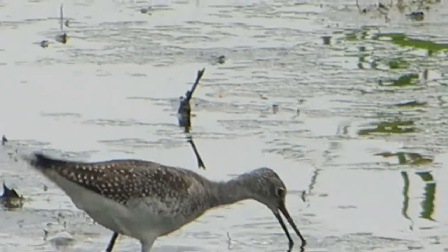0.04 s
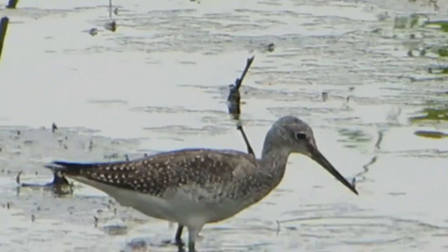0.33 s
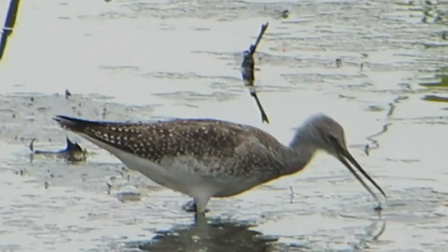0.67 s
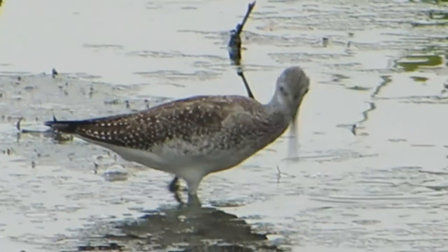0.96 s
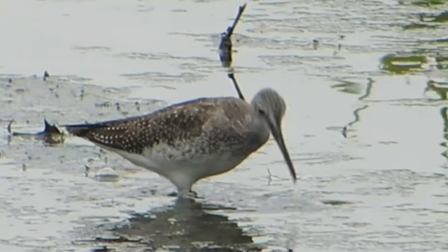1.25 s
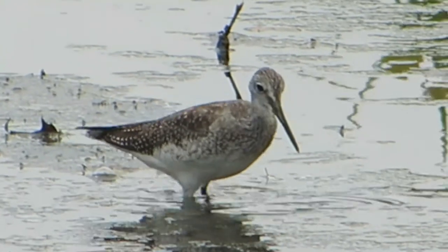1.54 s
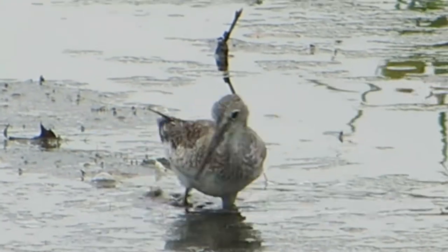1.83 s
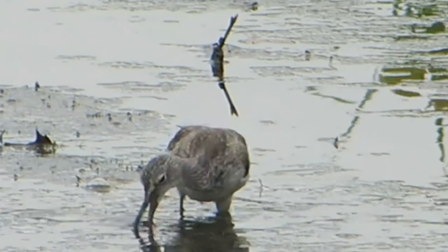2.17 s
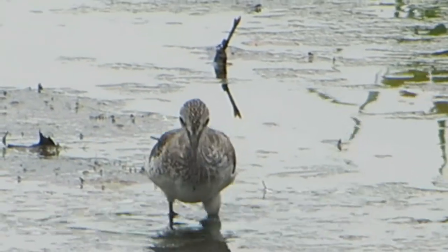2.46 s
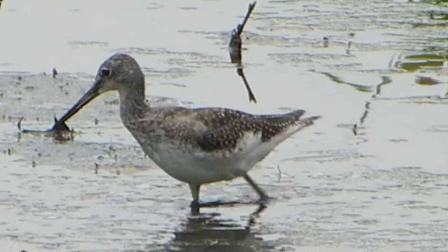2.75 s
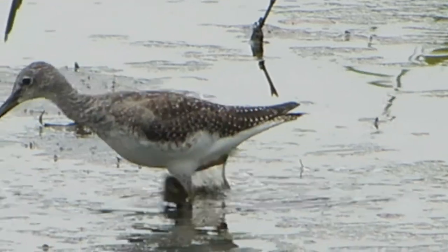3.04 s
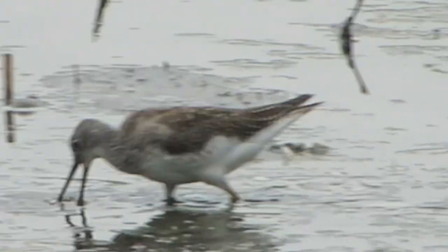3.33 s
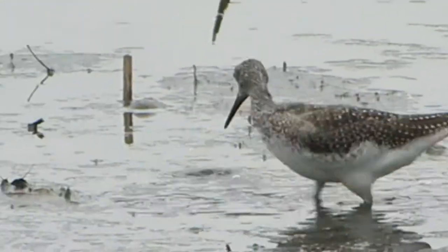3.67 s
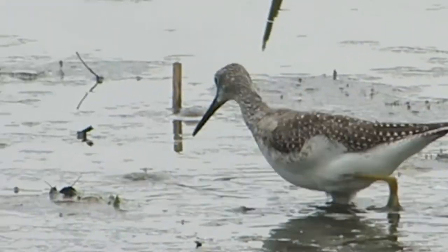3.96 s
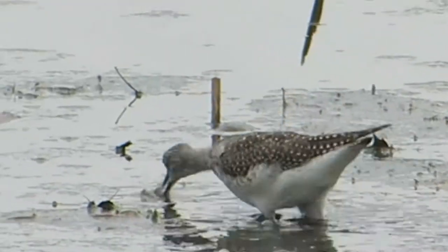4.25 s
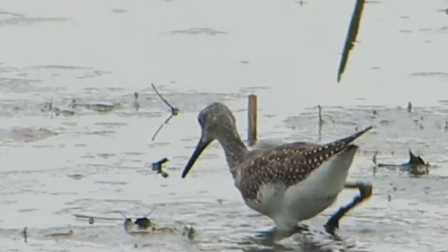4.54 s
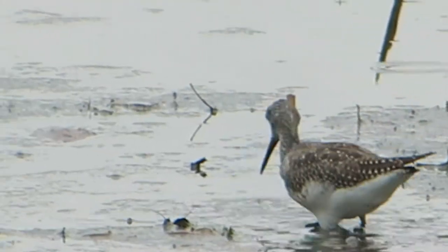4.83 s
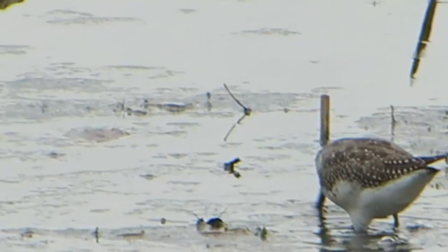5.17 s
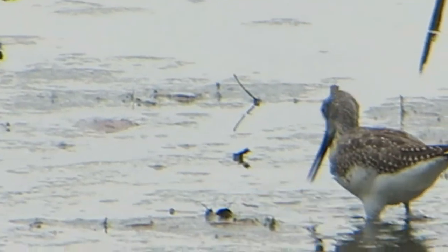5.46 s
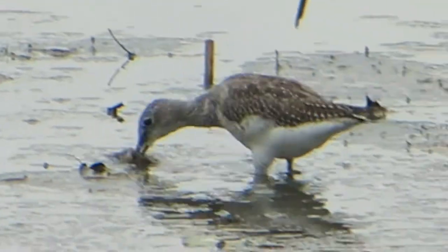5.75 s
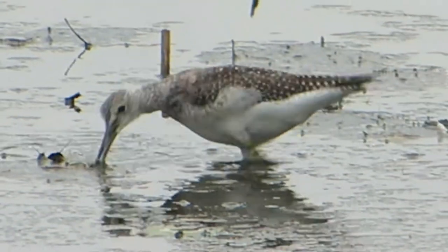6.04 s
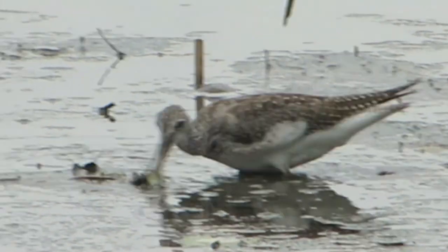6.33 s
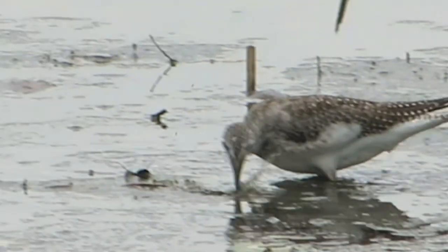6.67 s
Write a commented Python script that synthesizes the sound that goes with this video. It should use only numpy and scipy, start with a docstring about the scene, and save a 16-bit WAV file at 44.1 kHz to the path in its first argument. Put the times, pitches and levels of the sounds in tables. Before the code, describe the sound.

A steady low rumble of far road traffic and lorries, with thin insect buzzing and a few soft wind buffets.

```python
"""A marsh beside a distant road: tyres wash, engines rumble, and three lorries drone and fade.
Cicadas buzz their tymbals in the trees, three near enough to give thin tones over the chorus.
A far bird peeps, puffs of wind stir the reeds and buffet the microphone, and a few small ticks
sound close by. A faint electronic hiss lies under it all; the sound stops dead with a soft thump."""
import sys
import numpy as np
from scipy import signal
from scipy.fft import rfft, irfft
from scipy.io import wavfile

SR = 44100
rng = np.random.default_rng(int(sys.argv[2]) if len(sys.argv) > 2 else 0)


def materialize(psi):
    """Save the field psi as 16-bit PCM at rate SR to the path in sys.argv[1].

    A 1-D psi becomes a single channel; in a 2-D psi each row is a channel.
    """
    bounded = np.clip(np.atleast_2d(psi).T, -1, 1)
    quanta = np.round(bounded * 32767).astype(np.int16)
    wavfile.write(sys.argv[1], SR, quanta)


N = 295470
TIME = np.arange(N) / SR
BIN_HZ = np.arange(N // 2 + 1) * SR / N


def undb(db):
    """Decibels to gain."""
    return 10 ** (np.asarray(db) / 20)


def unit(x):
    """Scale to rms 1."""
    return x / np.sqrt(np.mean(x ** 2))


def curve(points):
    """Automation: straight lines through (t/s, value) points."""
    return np.interp(TIME, *np.transpose(points))


def ramp(start_s, length_s):
    """A linear rise from 0 to 1."""
    return np.clip((TIME - start_s) / length_s, 0, 1)


def swell(peak_s, half_s):
    """A pass-by envelope: 1 at its peak, 6 dB down half_s before and after."""
    return 1 / (1 + ((TIME - peak_s) / half_s) ** 2)


def walk(rate_hz):
    """A random wander of rms 1, with rate_hz new values a second."""
    levels = rng.standard_normal(int(N / SR * rate_hz) + 3)
    return unit(np.interp(TIME * rate_hz + rng.random(), np.arange(len(levels)), levels))


def lowpass(x, hz, order=2):
    """Butterworth low-pass."""
    return signal.sosfilt(signal.butter(order, hz, fs=SR, output="sos"), x)


def pan(x, left_db):
    """Lean a sound left by so many dB."""
    return x * undb(np.vstack([left_db, -left_db]) / 2)


def noise(colour):
    """Noise of rms 1, shaped by (f/Hz, level/dB) points and rolled off past both ends."""
    hz, db = np.transpose(colour)
    f = np.maximum(BIN_HZ, 1)
    rolloff = np.minimum(f / hz[0], 1) ** 2 * np.minimum(hz[-1] / f, 1) ** 2
    shape = undb(np.interp(np.log(f), np.log(hz), db))
    return unit(irfft(rfft(rng.standard_normal(N)) * rolloff * shape, N))


def bed(colour, side_db):
    """A wide noise bed: independent mid and side."""
    return noise(colour) + undb(side_db) * noise(colour) * np.array([[1], [-1]])


def gliding_band(peak_s, half_s, centre_hz, glide_hz_per_s, width_hz, level_db, left_db):
    """A band of noise that slides in pitch as it comes and goes."""
    hz = centre_hz + glide_hz_per_s * (TIME - peak_s)
    flutter = lowpass(rng.standard_normal(N) + 1j * rng.standard_normal(N), width_hz / 2, order=3)
    band = unit(np.real(flutter * np.exp(2j * np.pi * np.cumsum(hz) / SR)))
    return pan(band * swell(peak_s, half_s) * undb(level_db), left_db)


# Colour of the hiss: f/Hz, relative level/dB
HISS_SPECTRUM = [(1000, 3), (5000, 2.5), (10000, 0), (11800, -3), (13000, 3.5), (14000, -13), (15500, -32)]
def electronics(hiss_db=-66.5, whine_hz=15734, whine_db=-84):
    """The noise floor: electronic hiss and a faint high whine."""
    whine = np.sqrt(2) * np.sin(2 * np.pi * whine_hz * TIME)
    return undb(hiss_db) * bed(HISS_SPECTRUM, side_db=4.5) + undb(whine_db) * whine


# Colour of the reeds: f/Hz, relative level/dB
REED_SPECTRUM = [(2400, -6.5), (3300, 4), (4100, 2), (5400, -3), (7500, -15.5)]
# Gusts in the reeds: peak t/s, 6 dB fall/s, level/dB
REED_GUSTS = [(.1, 0.56, -58.5), (5.8, 1.2, -63)]
def reeds():
    """A soft rustle that rises and falls with the gusts."""
    strength = sum(undb(db) * swell(s, half_s) for s, half_s, db in REED_GUSTS)
    return bed(REED_SPECTRUM, side_db=-8.0) * strength


# Bird calls: t/s, f/Hz, level/dB
BIRD_PEEPS = [(1.32, 3290, -59), (1.76, 3860, -60.5), (2.26, 3850, -57.5)]
def bird(attack_s=0.02, t60_s=0.55, sag_hz_per_s=700, waver=0.02):
    """A far bird's faint, unsteady peeps sag as they die."""
    out = 0
    for s, start_hz, db in BIRD_PEEPS:
        age = np.maximum(TIME - s, 0)
        hz = (start_hz - sag_hz_per_s * np.minimum(age, t60_s)) * (1 + waver * walk(150))
        gain = undb(db) * ramp(s, attack_s) * np.exp(-np.log(1000) * age / t60_s)
        out = out + gain * np.sin(2 * np.pi * np.cumsum(hz) / SR)
    return out


# Close ticks: t/s, peak level/dB, ring f/Hz, knock against ring/dB
CLOSE_TICKS = [(5.3233, -33, 4700, -9), (5.3275, -32.5, 4600, -9), (5.526, -31.5, 3900, -5),
               (5.6558, -22.5, 5300, -2.5), (5.6572, -33, 9400, -9), (5.6576, -30.5, 5200, -6),
               (5.6584, -32.5, 9800, -7), (5.6591, -35, 7000, -7)]
def ticks(t60_s=0.0016, grit_db=-9, grit_t60_s=0.01, knock_hz=1900, edge_hz=11500):
    """Tiny snaps: each rings for a few cycles over a duller knock and sheds a little bright grit."""
    t = TIME[:SR // 50]
    out = np.zeros(N)
    for s, db, hz, knock_db in CLOSE_TICKS:
        tones = np.sin(2 * np.pi * hz * t) + undb(knock_db) * np.sin(2 * np.pi * knock_hz * t)
        ring = tones * np.exp(-np.log(1000) * t / t60_s)
        burst = rng.standard_normal(len(t)) * np.exp(-np.log(1000) * t / grit_t60_s)
        grit_band = signal.butter(2, [hz / 1.6, min(hz * 1.5, SR / 3)], "band", fs=SR, output="sos")
        snap = lowpass(ring + undb(grit_db) * signal.sosfilt(grit_band, burst), edge_hz, order=6)
        start = int(s * SR)
        out[start:start + len(t)] += undb(db) * snap / np.abs(snap).max()
    return pan(out, left_db=4)


# Wind buffets, then in the last row a soft low thump as the sound cuts off:
# t/s, level/dB, half-length/s, cutoff f/Hz
LOW_THUMPS = [(0.046, -21.5, 0.0084, 263), (0.262, -34, 0.022, 230), (2.003, -44, 0.035, 170),
              (2.85, -50, 0.13, 79.2), (4.745, -42, 0.064, 120.8), (5.444, -29, 0.041, 197),
              (5.454, -30, 0.018, 374), (5.536, -35.5, 0.074, 150.3), (5.667, -35.5, 0.025, 150),
              (5.878, -37, 0.038, 171), (6.055, -42, 0.051, 120), (6.22, -37, 0.027, 109.7)]
def wind_and_end_thump(breeze_db=-66.5, breeze_hz=70, gust_db=-59.5, flutter_db=4, mid_db=-12):
    """Eddies push the microphone's two ports mostly in opposite directions; a thump marks the cut."""
    low_colour = [(15, -19.0), (35, 3.5), (120, 0.5), (500, -1.5)]  # f/Hz, relative level/dB
    strength = undb(breeze_db) + undb(gust_db) * swell(peak_s=5.8, half_s=0.25)
    side = unit(lowpass(noise(low_colour), breeze_hz)) * strength * undb(flutter_db * walk(6))
    mid = 0
    rumble = np.array([noise(low_colour), noise(low_colour)])
    for s, db, half_length_s, cutoff_hz in LOW_THUMPS:
        envelope = np.exp(-2 * ((TIME - s) / half_length_s) ** 2)
        thump = lowpass(rumble, cutoff_hz, order=4) * envelope
        rms = np.sqrt(np.sum(thump ** 2, axis=1, keepdims=True) / np.sum(envelope ** 2))
        side_thump, mid_thump = undb(db) * thump / rms
        side, mid = side + side_thump, mid + undb(mid_db) * mid_thump
    return np.array([mid + side, mid - side])


# Two insect buzzes, then the fading cicada's sag:
# peak t/s, 6 dB fall/s, f/Hz, glide/(Hz/s), width/Hz, level/dB, left/dB
SHORT_BUZZES = [(.4, 0.7, 7350, 0.5, 160, -64, 4.5), (1.23, 0.44, 6850, 2, 300, -63, 1.5),
                (3.75, 0.1, 5440, -400, 299, -64.5, 0)]
def short_buzzes():
    """Two high insect buzzes come and go; later the fading cicada's buzz slides down as it slows."""
    return sum(gliding_band(*row) for row in SHORT_BUZZES)


# Colour of the cicada chorus: f/Hz, relative level/dB
CHORUS_SPECTRUM = [(3000, -13), (4600, -13), (5500, -4.5), (6100, -5), (7200, -2), (8000, -6), (8800, -8),
                   (9800, -16), (12000, -22)]
def cicada_chorus(sizzle_db=-58, swell_db=1.17, buzz_ratio_db=-0.5, count=9):
    """Many far cicadas: most blur into a sizzle, a few keep their pulse. The bed lifts a little midway."""
    body = undb(np.interp(BIN_HZ, *np.transpose(CHORUS_SPECTRUM), left=-np.inf, right=-np.inf))
    buzz = 0
    for rate_hz, left_db in zip(rng.uniform(200, 350, count), rng.normal(0, 2.7, count)):
        cycles = np.cumsum(rate_hz * (1 + .001 * walk(0.98) + 0.000403 * walk(25))) / SR
        # one click a cycle, a sample or two wide
        clicks = np.exp(-((cycles % 1 - .5) * SR / rate_hz) ** 2)
        song = unit(irfft(rfft(clicks) * body, N))
        buzz = buzz + pan(song * undb(3.4 * walk(0.99)), left_db)
    sizzle = bed(CHORUS_SPECTRUM, side_db=-2.5) * undb(0.93 * walk(17))
    gain = undb(sizzle_db + swell_db * ramp(start_s=3.69, length_s=0.47))
    return pan(sizzle + undb(buzz_ratio_db) * unit(buzz), left_db=2.0) * gain


def cicada(hz, gain, tones, morph, left_db, jitter=.0005, flicker_db=1.5, drift_db=.5, scatter_rad=0.6):
    """A buckling tymbal's overtones morph from early to late levels; moving leaves make them shimmer."""
    phase = 2 * np.pi * np.cumsum(hz * (1 + jitter * walk(60))) / SR
    out = 0
    for harmonic, early_db, late_db in tones:
        stereo_phase = scatter_rad * np.array([walk(45), walk(45)]) + 2 * np.pi * rng.random()
        db = early_db + (late_db - early_db) * morph + flicker_db * walk(7.5) + drift_db * walk(2.8)
        out = out + undb(db) * np.sin(harmonic * phase + stereo_phase)
    return pan(out * gain, left_db)


# Overtones its body favours, before trim: harmonic, early level/dB, late level/dB
ANSWERING_OVERTONES = [(42, -76, -74), (50, -71, -74), (51, -72, -65), (52, -76, -67), (53, -73, -71),
                       (55, -72, -73)]
def answering_cicada(rate_hz=135.9, start_s=3.85, trim_db=1.5):
    """A slower, fainter song joins in with the swelling one."""
    gain = undb(trim_db) * ramp(start_s, length_s=0.48)
    return cicada(rate_hz, gain, ANSWERING_OVERTONES, morph=ramp(5.2, 1.0), left_db=1.0)


# Overtones its body favours, before trim: harmonic, early level/dB, late level/dB
FADING_OVERTONES = [(16, -75, -78), (17, -69, -69), (18, -76, -67), (19, -75, -80), (20, -79, -71),
                    (21, -74, -73), (22, -75, -80), (23, -70.5, -74), (25, -76, -77), (27, -76, -74),
                    (28, -85, -83), (29, -80, -80)]
def fading_cicada(rate_hz=322.2, tires_s=2.8, sag_hz_per_s=4.5, trim_db=4.0):
    """A song in full swing: the tymbal tires and slows, then the song dies away."""
    hz = rate_hz - sag_hz_per_s * np.maximum(TIME - tires_s, 0)
    gain = undb(trim_db) * (1 - ramp(start_s=3.2, length_s=1.3))
    return cicada(hz, gain, FADING_OVERTONES, morph=ramp(.5, 1.5), left_db=-0.5)


# Overtones its body favours, before trim: harmonic, early level/dB, late level/dB
SWELLING_OVERTONES = [(33, -73, -70), (35, -65, -64.5), (36, -80, -70), (37, -74, -69), (39, -69.5, -68),
                      (40, -73, -80), (41, -79, -73), (43, -81, -73), (44, -73, -74), (45, -66.5, -62.5),
                      (46, -69, -76), (47, -78, -70), (48, -69.5, -73), (49, -67, -66.5), (50, -68.5, -75),
                      (51, -77, -70), (52, -61.5, -70), (53, -71, -68), (54, -72, -71), (55, -76, -76),
                      (56, -75, -78), (57, -71, -69.5), (59, -81, -79)]
def swelling_cicada(rate_hz=148.99, start_s=3.85, quicken_hz_per_s=.62, trim_db=5.0):
    """A new song swells and holds while its tymbal slowly quickens."""
    hz = rate_hz + quicken_hz_per_s * (TIME - start_s)
    gain = undb(trim_db) * ramp(start_s, length_s=0.66)
    return cicada(hz, gain, SWELLING_OVERTONES, morph=ramp(4.89, .8), left_db=0.5)


def lorry(speed, tones, trim_db, leaves_s, recede_s, waver=0.0048, flicker_db=0.7):
    """A drone that follows engine speed; once the lorry leaves, its distance doubles in recede_s."""
    distance = 1 + np.maximum(TIME - leaves_s, 0) / recede_s
    engine_time = np.cumsum(speed * (1 + waver * walk(14))) / SR
    drone = 0
    for hz, db in tones:
        gain = undb(db + flicker_db * walk(9))
        drone = drone + gain * np.sin(2 * np.pi * (hz * engine_time + rng.random()))
    return pan(np.sqrt(2) * drone * undb(trim_db) / distance, left_db=-2.0)


# Each lorry's engine tones at cruising speed, before trim: f/Hz, level/dB
EASING_DRONE = [(170, -60.5), (188.5, -51), (283, -73.5)]
PULLING_DRONE = [(28, -60), (71, -58), (129.5, -50), (153, -55), (212.5, -52.5)]
FAR_DRONE = [(245, -56.5), (360, -60)]
# Engine revs: t/s, share of cruising speed
EASING_REVS = [(0, .955), (.35, .992), (.8, 1.008), (1.15, .987), (1.4, .935), (1.7, .88), (2.4, .875),
               (3.2, .84)]
PULLING_REVS = [(0, 1.01), (.4, 0.93), (.8, 1), (1.25, .985), (2, 1.1)]
def lorries():
    """Three lorries recede: one revs and eases off, one dips and pulls away, a far one hums steadily."""
    return (lorry(curve(EASING_REVS), EASING_DRONE, trim_db=0, leaves_s=1.1, recede_s=0.6)
            + lorry(curve(PULLING_REVS), PULLING_DRONE, trim_db=-0.5, leaves_s=1.15, recede_s=0.16)
            + lorry(1, FAR_DRONE, trim_db=-2.0, leaves_s=1.4, recede_s=0.77))


# Tread and exhaust bands: peak t/s, 6 dB fall/s, f/Hz, glide/(Hz/s), width/Hz, level/dB, left/dB
SINGING_TREADS = [(0.079, 1.5, 1100, -1, 800, -54, -2.5), (0.851, 1.1, 1110, -25, 230, -51, -3),
                  (0.53, 1.26, 1450, -0.5, 440, -53, -1.5), (1.05, 0.47, 1830, -300, 760, -48.5, -1),
                  (2.9, 2.5, 1020, -15, 215, -55.5, -4.5), (3.2, -0.03, 760, -29, 110, -53.5, -3),
                  (4.3, 0.23, 700, -29.5, 150, -57, -1.5), (4.5, 0.94, 1850, 0.5, 830, -56, -1),
                  (5.95, 0.6, 1880, 90, 140, -54, 4.0)]
EXHAUST_BOOMS = [(.5, 0.95, 430, -10, 220, -58.5, -1.5), (6.15, .25, 400, -0.5, 240, -56.5, -1),
                 (1.6, .4, 50, -0.5, 40, -60.5, -1), (4.25, 0.9, 130, 0, 60, -60, -0.5),
                 (2.35, 0.14, 152, -25.5, 70, -52.5, -2), (3.0, 1.1, 56, 0, 22, -58.5, -3.5),
                 (4.58, 0.06, 43, 0.5, 27, -56, 0)]
def pass_bys():
    """Single vehicles poke out of the wash: tyre treads sing and far exhausts boom."""
    return sum(gliding_band(*row) for row in SINGING_TREADS + EXHAUST_BOOMS)


# Colours of the engine rumble and its low end: f/Hz, relative level/dB
ENGINE_SPECTRUM = [(25, -27), (90, -7), (125, -1.5), (160, -2), (200, -3), (250, -2), (320, -4.5),
                   (450, -16), (900, -20)]
SUB_SPECTRUM = [(10, -29.5), (20, -8), (32, 0.5), (60, 1.5), (90, 3.5), (160, -20), (400, -29)]
def engine_rumble(gain, trim_db=-2.5, sub_db=-56.5):
    """Far engines blur together; the low end carries from the whole road, so it swells half as much."""
    engines = pan(bed(ENGINE_SPECTRUM, side_db=-11.5), left_db=-3.0) * gain * undb(trim_db)
    sub = bed(SUB_SPECTRUM, side_db=-21.5) * undb(sub_db) * np.sqrt(gain / gain.max())
    return engines + sub


# Colour of the tyre wash: f/Hz, relative level/dB
TYRE_SPECTRUM = [(150, -31), (420, -7), (520, -4.5), (660, -1.5), (820, -3.5), (1050, -1.5), (1200, -1.5),
                 (1320, -0.4), (1700, -2), (2100, -5), (2600, -9), (3400, -15.5), (4600, -22.5),
                 (9000, -41.5)]
# Treble ride as vehicles pass gaps in the trees: t/s, relative level/dB
TYRE_TREBLE = [(0, -5.5), (.65, -1.9), (1.85, -4.5), (2.5, -3), (3.6, 0.4), (4.6, -.3), (6.2, 3)]
def tyre_wash(gain, trim_db=1.9, flutter_db=0.1, crossover_hz=1500):
    """Tyres roar and flutter slightly in the moving air, just right of centre, then drifting left."""
    wash = bed(TYRE_SPECTRUM, side_db=-9.5)
    lows = signal.sosfiltfilt(signal.butter(2, crossover_hz, fs=SR, output="sos"), wash)
    body = lows * undb(flutter_db * walk(7.0))
    treble = (wash - lows) * undb(curve(TYRE_TREBLE) + flutter_db * walk(12))
    left_db = -1.5 + 7.0 * ramp(start_s=5.0, length_s=1.9)
    return pan((body + treble) * gain * undb(trim_db), left_db)


# Bunches of vehicles, before trim: nearest t/s, 6 dB fall/s, tyre level/dB, engine level/dB
VEHICLE_BUNCHES = [(.4, 2.5, -48, -47.5), (5.9, 1, -60, -52)]
def traffic(stream_tyre_db=-49, stream_engine_db=-54):
    """An unbroken stream of far traffic swells with each bunch of vehicles."""
    tyre_gain, engine_gain = undb(stream_tyre_db), undb(stream_engine_db)
    for s, half_s, tyre_db, engine_db in VEHICLE_BUNCHES:
        nearness = swell(s, half_s)
        tyre_gain = np.hypot(tyre_gain, nearness * undb(tyre_db))
        engine_gain = np.hypot(engine_gain, nearness * undb(engine_db))
    return tyre_wash(tyre_gain) + pass_bys() + engine_rumble(engine_gain)


def scene():
    """The mix: road, insects, bird, wind and close ticks over the noise floor."""
    insects = cicada_chorus() + fading_cicada() + swelling_cicada() + answering_cicada() + short_buzzes()
    road = traffic() + lorries()
    return road + insects + bird() + wind_and_end_thump() + reeds() + ticks() + electronics()


def record(dry, stop_s=6.228, top_hz=15780):
    """A hard cut to silence, and a steep low-pass that shaves off the top."""
    high_cut = signal.ellip(10, .2, 70, top_hz, fs=SR, output="sos")
    return signal.sosfilt(high_cut, dry * (TIME < stop_s))


dry = scene()
out = record(dry)
materialize(out)
```